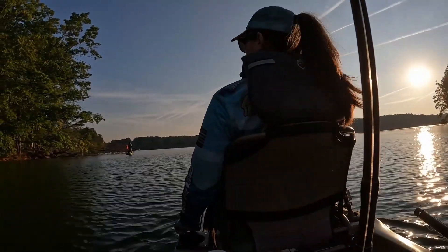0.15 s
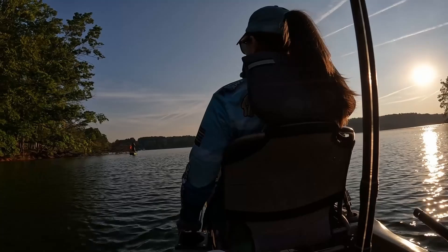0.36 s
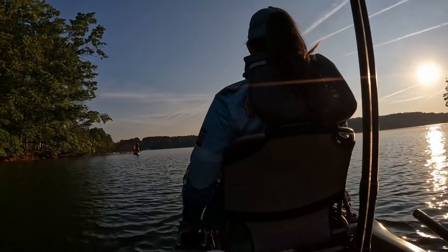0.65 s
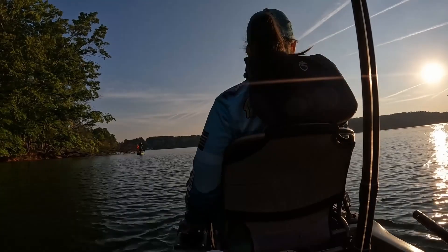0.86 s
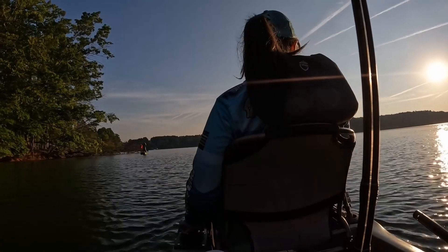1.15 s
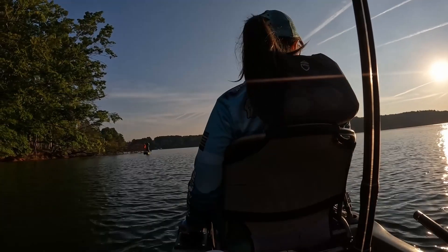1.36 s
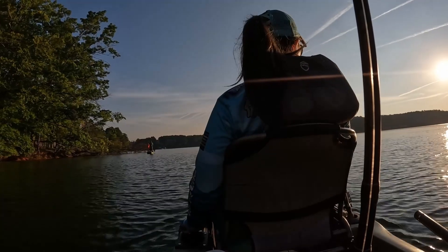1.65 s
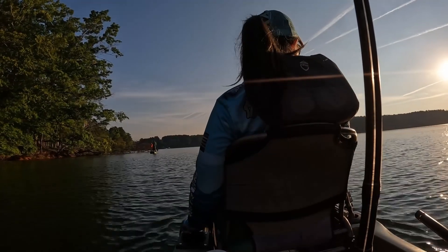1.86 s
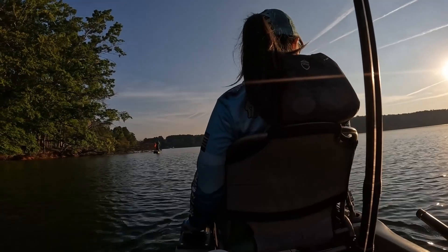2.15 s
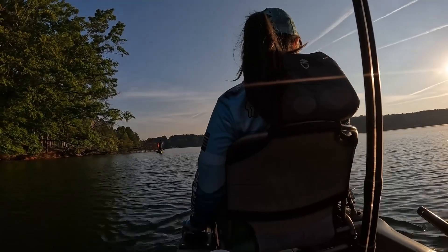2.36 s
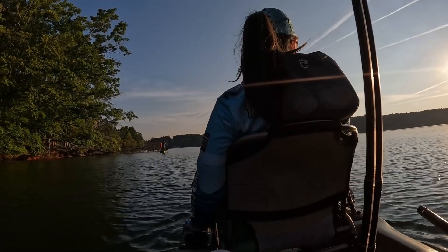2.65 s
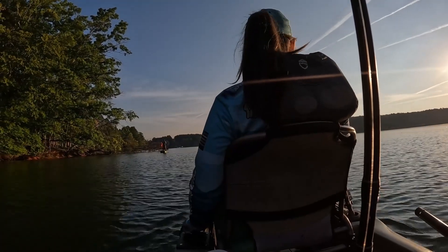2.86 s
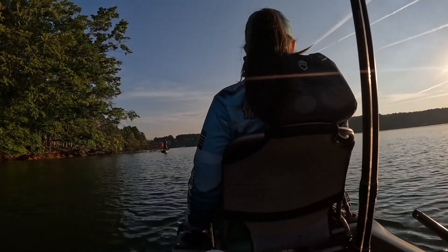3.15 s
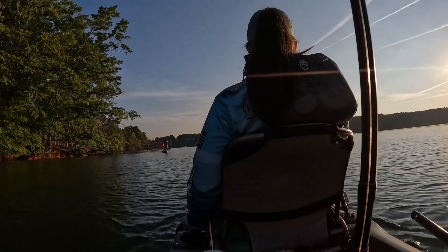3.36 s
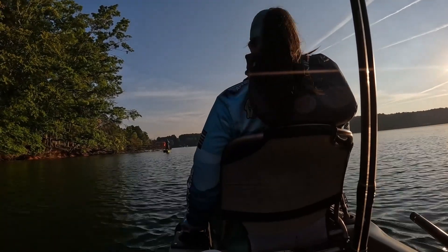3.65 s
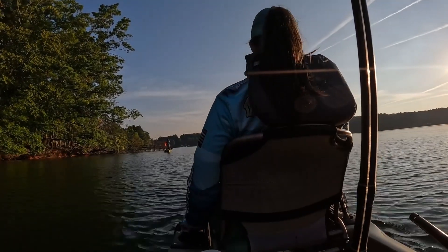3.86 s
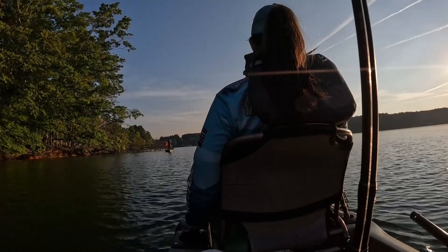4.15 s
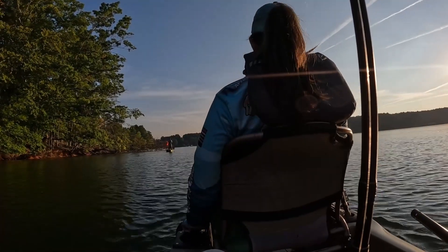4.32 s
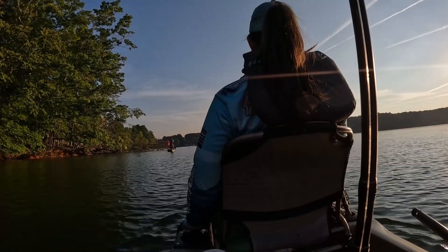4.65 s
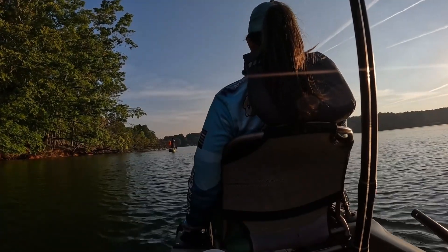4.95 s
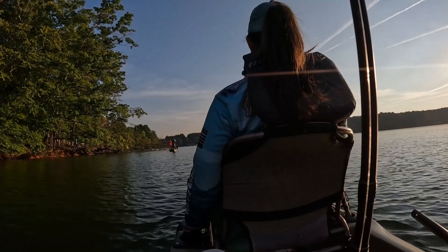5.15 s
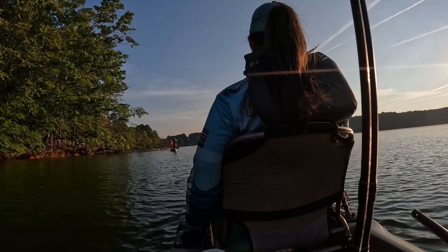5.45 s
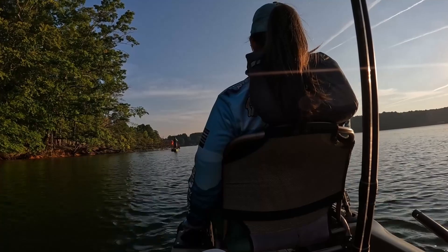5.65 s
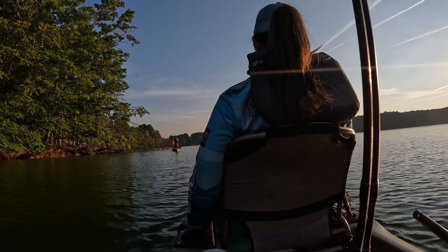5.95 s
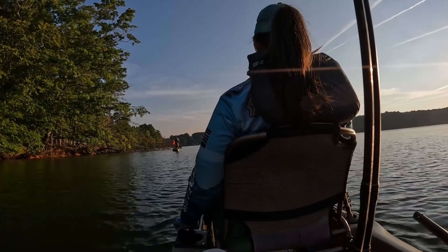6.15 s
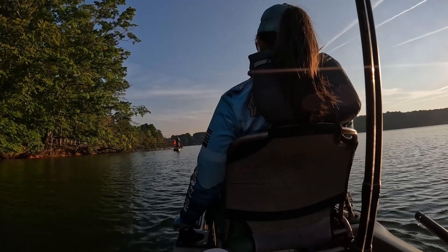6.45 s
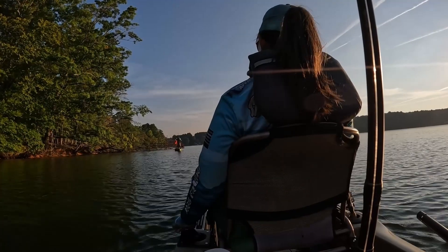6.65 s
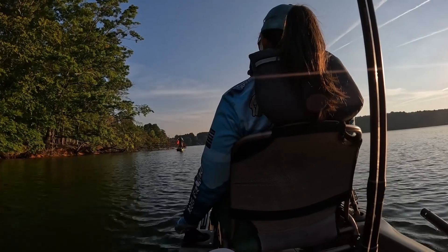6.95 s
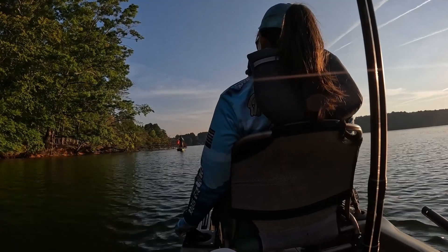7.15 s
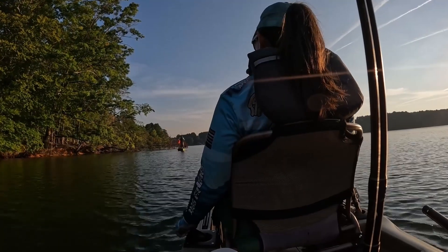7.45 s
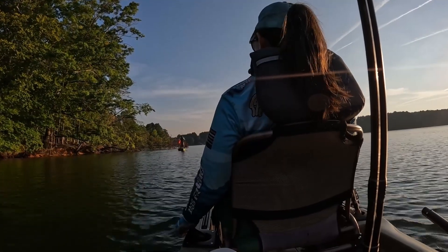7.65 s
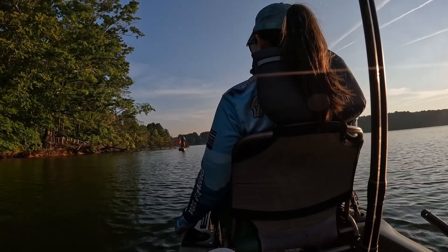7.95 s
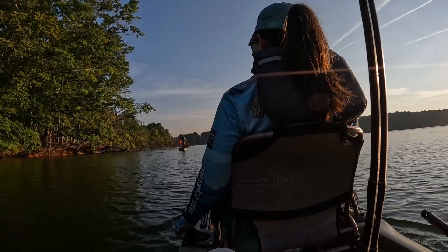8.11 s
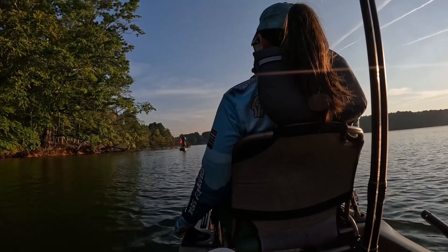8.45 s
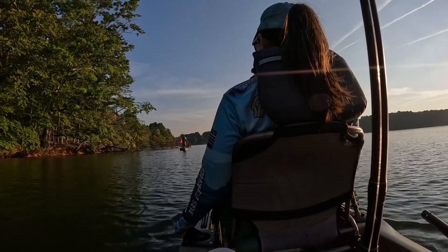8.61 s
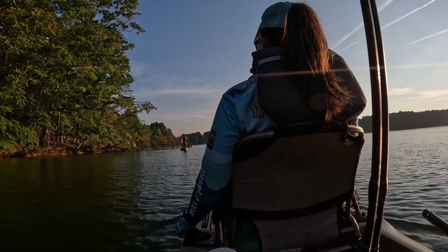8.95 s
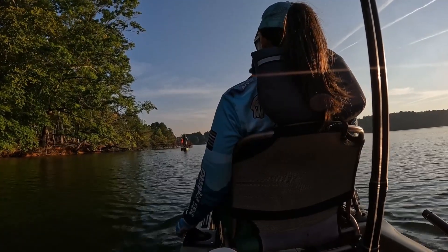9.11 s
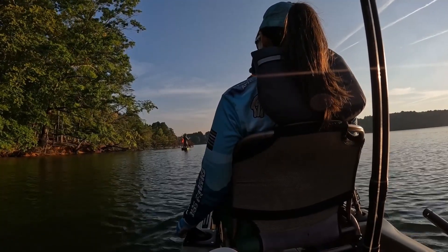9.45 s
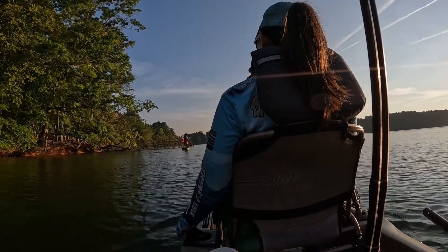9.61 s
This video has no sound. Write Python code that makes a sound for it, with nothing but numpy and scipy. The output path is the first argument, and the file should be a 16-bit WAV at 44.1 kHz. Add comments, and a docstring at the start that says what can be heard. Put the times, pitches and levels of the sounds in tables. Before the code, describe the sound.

Calm lake water gulps low under a hollow plastic kayak, with wet slaps, bubbly plops, small trickles and occasional dry fitting clicks close by.

```python
"""Low gulps under a hollow plastic hull come first, with slaps and plops along its side: a kayak on a calm lake,
heard by a stereo pair just behind the seat. Gulps are short gliding tones; slaps are a bubble note in splash noise.
Crowds of small bubbles make the lapping and trickling, and filtered noise makes the wash, murmur and hiss.
Close by, fittings click as noise bursts in resonances, ringing modes make one knock on the deck, and a jacket
rustles as grainy noise. Far off in the trees a bird calls faintly, a run of arched notes smeared by the woods."""
import sys
import numpy as np
from scipy import signal
from scipy.fft import rfft, irfft
from scipy.io import wavfile
from scipy.ndimage import uniform_filter1d

SR = 44100
rng = np.random.default_rng(int(sys.argv[2]) if len(sys.argv) > 2 else 0)


def generate_wav(sig):
    """Save sig (samples, or channels by samples) to the path in sys.argv[1] as 16-bit PCM at SR."""
    pcm = np.round(np.clip(np.atleast_2d(sig).T, -1, 1) * 32767).astype(np.int16)
    wavfile.write(sys.argv[1], SR, pcm)


N = 431298

# Air pockets under the hull. Each row: crest [s], peak level [dB], pitch [Hz], left over right [dB].
GULPS = [(0.013, -38.5, 138, -16), (0.201, -40, 133, 4), (0.457, -32.5, 133, -10), (0.456, -39, 316, -22),
         (0.477, -32.5, 216, -20), (0.477, -48, 343, -22), (0.531, -37.5, 97, -10),
         (0.557, -36.5, 143, -15), (0.61, -37.5, 121, -7), (0.698, -44, 119, -6), (0.924, -43, 99, -4),
         (1.003, -45, 110, -4), (1.461, -37.5, 115, -10), (1.542, -41, 149, -8), (1.595, -30.5, 162, -14),
         (1.6, -39.5, 277, -20), (1.775, -45.5, 153, 14), (2.291, -39, 101, -7), (2.676, -37, 119, -9),
         (2.73, -42.5, 115, -8), (2.797, -36, 112, -6), (3.1, -52, 440, -17), (3.103, -32, 221, -26),
         (3.153, -35, 132, -13), (3.193, -37.5, 120, -14), (3.395, -38, 112, -5), (3.469, -44, 125, 10),
         (3.806, -41.5, 115, -8), (3.861, -37, 140, 7), (4.125, -30, 133, -5), (4.143, -35.5, 130, 2),
         (4.166, -48, 417, 0), (4.203, -39, 118, 3), (4.271, -34.5, 133, 3), (4.297, -36, 177, -7),
         (4.671, -43, 136, -6), (4.713, -28.5, 133, -8), (4.752, -40, 152, -15), (4.927, -41, 106, -5),
         (5.108, -32.5, 176, -21), (5.294, -47, 319, -4), (5.298, -33, 180, 14), (5.325, -40, 150, -12),
         (5.722, -37, 135, -10), (5.806, -38, 126, -8), (5.831, -37.5, 169, -14), (6.008, -37, 246, -21),
         (6.099, -40, 93, -4), (6.24, -38, 102, -8), (6.289, -35.5, 142, 2), (6.377, -39.5, 121, -7),
         (6.769, -36.5, 142, -15), (6.808, -41, 110, -5), (6.976, -44, 102, -8), (6.998, -37.5, 101.5, -9),
         (7.114, -43.5, 105, -6), (7.589, -40.5, 99, -6), (7.656, -43, 131, -13), (8.028, -36, 120, -9),
         (8.271, -35, 116, -1), (8.327, -44, 129, -11), (8.596, -42.5, 115, -17), (8.746, -41.5, 155, 9),
         (9.298, -41.5, 99.4, -7), (9.352, -39, 110, -5.5)]
# Slaps at the waterline beside the seat.
# Each row: start [s], bubble level before trim [dB], bubble pitch [Hz], splash re bubble before trim [dB].
SLAPS = [(0.099, -56.5, 1570, -4), (0.664, -50, 1063, 1), (0.879, -49.5, 1880, -9), (0.885, -50.5, 1165, 3),
         (0.896, -46.5, 1466, -10), (0.914, -55, 574, -10), (0.976, -59, 1200, -5), (1.011, -59, 1920, 0),
         (1.042, -54, 3120, -23), (1.055, -46.5, 1796, -25), (1.484, -48.5, 1140, -14),
         (1.514, -44.5, 976, -16), (1.519, -49, 740, -1), (1.639, -50, 1110, -24), (1.767, -60.5, 747, 14),
         (1.994, -56.5, 1550, -3), (2.221, -53.5, 1245, -5), (2.239, -54, 750, 3.5),
         (2.424, -47.5, 659, -12), (2.511, -69.5, 1180, 2), (2.739, -53, 1490, -7), (2.809, -62, 737, -3),
         (2.927, -67, 900, -16), (3.026, -64, 1790, -16), (3.151, -63.5, 1000, -4), (3.223, -61, 1300, 4),
         (3.297, -57, 1565, 9), (4.106, -45.5, 887, 11), (4.145, -36, 885, 0.5), (4.156, -37, 617, -2),
         (4.174, -44.5, 587, -6), (4.241, -47.5, 875, 0), (4.269, -55, 654, 0), (4.336, -52, 980, -6),
         (4.544, -55, 1080, 1), (4.852, -33.5, 1007, -16), (4.8494, -40, 1516, -8), (4.852, -57.5, 2980, 1),
         (4.859, -48.5, 610, -23), (5.287, -49, 768, 11.5), (5.332, -59.5, 1030, 7),
         (5.539, -60.5, 1250, 5), (5.587, -58, 940, 1), (5.612, -65.5, 900, 12), (5.664, -59.5, 730, 5),
         (5.891, -57.5, 2210, -3), (5.906, -53.5, 1020, 3.5), (6.043, -61.5, 1830, 4.5),
         (6.14, -54, 1170, 9.5), (6.172, -50.5, 950, 11.5), (6.282, -60.5, 740, 14.5),
         (6.695, -58.5, 1020, -1), (6.776, -59, 2870, -26), (6.823, -74, 696, 12),
         (6.844, -61.5, 1280, -10), (7.49, -62, 1930, -14), (8.411, -62.5, 1160, 2),
         (8.508, -59.5, 970, -38), (8.566, -68.5, 1175, 0), (8.69, -66.5, 2510, -16),
         (9.228, -56, 1174, -3), (9.543, -63.5, 2350, -5), (9.61, -68.5, 1500, 10)]
# Ripples running along the side, as gains.
# Each row: start [s], length [s], lapping [dB], air tone [dB], trickle [dB].
RUNS = [(0.878, 0.16, -70.5, -90, -74), (1.627, 0.03, -77, -66, -95), (1.767, 0.17, -78.5, -66.5, -84),
        (1.982, 0.25, -80, -73, -76), (2.693, 0.31, -79.5, -98, -79), (3.203, 0.22, -89, -100, -71),
        (4.101, 0.039, -63, -61, -66), (4.224, 0.15, -87, -67, -73), (4.468, 0.26, -78, -77, -76),
        (4.823, 0.22, -89, -76, -82), (5.547, 0.11, -71, -80, -76), (6.552, 0.2, -98, -75, -89),
        (6.794, 0.13, -77, -87, -89), (7.54, 0.2, -74, -85, -88), (8.1, 0.057, -66, -76, -74),
        (8.904, 0.1, -92, -73.5, -99), (9.157, 0.25, -83, -74.5, -75)]
# The boat's rocking, as the level of the slosh between gulps. Each row: time [s], level [dB].
ROCKING = [(0.0, -71), (1.06, -54.5), (1.25, -63), (2.6, -62), (3.1, -60.5), (6.24, -53), (6.42, -62.5),
           (6.86, -57), (9.35, -62), (9.78, -63.5)]
# Moments when the small water sounds dip. Each entry: time [s].
LULLS = [0.02, 1.33, 2.58, 3.6, 5.82, 6.46, 7.36, 9.74]
# Resonances of the hollow hull. Each row: pitch [Hz], nominal width before widening [Hz], level [dB].
HULL = [(627, 50, -2.5), (675, 16.4, -10), (914, 72, -0.5), (1040, 35, -5.5), (1208, 120, 0.5),
        (1456, 130, -1)]
# Tone of the hull's air, kept ringing by the wash.
# Each row: pitch [Hz], nominal width before widening [Hz], level [dB].
AIR_TONE = [(942, 66, -3), (1510, 89, -14)]
# Clicks of the fittings. Each row: start [s], click level [dB], body tones re click before a common boost [dB].
CLICKS = [(0.246, -39.5, -1), (0.921, -48.5, -3), (1.087, -52, 6), (1.1482, -46.5, 2), (2.1189, -40.5, 2.5),
          (2.507, -58, -17), (3.4, -51, -7), (4.0277, -41.5, 2.5), (4.138, -50, 5.5), (4.159, -54, -14),
          (4.2404, -56, 6), (5.363, -58, 4), (5.562, -58.5, 3), (5.671, -55, -4), (6.103, -52.5, -27),
          (6.172, -42.5, -33), (6.188, -40.5, -9), (7.214, -59, -0.5), (7.466, -54, -26),
          (7.545, -38.5, -0.5), (7.65, -40.5, 0), (8.0245, -39, -1.5), (8.109, -51, -3), (8.359, -52, -19),
          (8.264, -60.5, 2), (9.4426, -58.5, -23)]
# Modes of the fittings, the three body tones first. Each row: pitch [Hz], width [Hz], level [dB].
FITTING_MODES = [(1108, 180, 4.5), (1537, 150, -5), (1870, 340, -7), (2650, 260, 2.5), (3390, 280, 1),
                 (4320, 160, -2), (5110, 220, -3), (5990, 490, -6.5), (7500, 690, -11), (10370, 1400, -20)]
# A knock on the deck and its rebound. Each row: start [s], gain [dB].
KNOCKS = [(8.0713, -30), (8.075, -43.5)]
# Ringing modes of the deck. Each row: pitch [Hz], level [dB], time to fall 60 dB [s].
DECK_MODES = [(680, -13.5, 0.062), (750, -17.5, 0.16), (970, -4, 0.032), (1150, -15, 0.039),
              (1180, -6.5, 0.038), (1640, -7.5, 0.0098), (2290, -14, 0.03), (2990, 4, 0.0083),
              (3250, 10.5, 0.0022), (4300, -15, 0.012), (4730, -8, 0.009), (5540, -17, 0.011),
              (6160, -5.5, 0.002)]
# The paddler shifts and the jacket rubs. Each row: crest [s], level [dB], build-up [s].
SHIFTS = [(1.0, -70.5, 0.59), (3.7, -75.5, 0.3), (4.15, -65, 0.096), (4.521, -63, 0.012),
          (4.945, -68.5, 0.038), (6.18, -61, 0.05), (8.09, -74.5, 0.11), (8.9, -81.5, 1),
          (9.43, -76.5, 0.54)]
# Loudness of the far bird. Each row: time [s], level [dB].
BIRD_LEVEL = [(2.4, -100), (2.55, -81.5), (3.4, -77.5), (4.3, -83), (4.8, -100)]
# Spectrum of the wash under the hull. Each row: frequency [Hz], relative density [dB per Hz].
SLOSH = [(20, -16.5), (40, -3.5), (70, 2), (110, -3), (170, -5), (255, -13), (320, -18), (450, -23.5),
         (700, -74.5)]
# Spectrum of the rubbing jacket. Each row: frequency [Hz], relative density [dB per Hz].
CLOTH = [(600, -26), (1500, 0), (3000, 0), (6500, -5), (8500, -13), (12000, -16), (15000, -45)]
# Spectrum of the hull's low murmur. Each row: frequency [Hz], relative density [dB per Hz].
MURMUR = [(25, -16.5), (60, -14), (120, 1), (180, -1), (255, -2), (320, -14.5), (440, -15), (530, -28),
          (700, -49)]
# Spectrum of the background hiss. Each row: frequency [Hz], relative density [dB per Hz].
HISS = [(300, 8.5), (550, 3.5), (950, -8), (1400, -4.5), (2600, -11.5), (3000, -6), (3500, 6), (4100, -5.5),
        (6300, -0.5), (7500, -4), (8500, -14.5), (10000, -12), (12000, -40), (13500, -39)]
# How alike left and right are in the noise layers. Each row: frequency [Hz], likeness [0 to 1].
LIKENESS = [(30, 1), (120, 0.84), (300, 1), (1000, 0.2), (3500, 0.46), (7000, 0.61), (12000, 0.045)]

GULP_LEAD_S = 0.06  # each gulp is drawn this far either side of its crest
# The harder the water hits, the sooner the pocket closes:
# cycles from a middling strength up, doubled for every so many dB less.
GULP_CYCLES, MIDDLING_GULP_DB, GULP_HALVING_DB = 1.69, -30.5, 19
# The slosh swells around every gulp: level re the gulp, and the most the swell can reach.
STIR_DB, STIR_RISE_S, STIR_FALL_S, SLOSH_TOP_DB = -14.5, 0.023, 0.055, -50
# The onset of a slap takes half as long for every so many dB above a middling one.
MIDDLING_SLAP_DB, SLAP_HALVING_DB, MIDDLING_SLAP_HZ = -52, 15.5, 1030
FLUTTER_HZ = (40, 302)  # how fast a splash breaks up and its bubble wobbles
PUSH_HZ = (278, 613)  # the dull push of a wavelet on the side
RUN_RISE_S, RUN_FALL_S = 0.053, 0.058
CALM_LAPPING_DB, CALM_RINGING_DB, CALM_TRICKLE_DB = -83, -90.5, -88  # gains between the ripples
# Every slap leaves a wake of bubbles and a finer fizz: base levels re the slap, then lag, rise and fall.
WAKE_DB, FIZZ_DB, WAKE_LAG_S, WAKE_RISE_S, WAKE_FALL_S = -24, -48, 0.0041, 0.018, 0.084
# A splashy slap stirs more; a higher one leaves slightly more wake and far more fizz.
WAKE_SPLASH_SHARE, WAKE_DB_PER_OCTAVE, FIZZ_DB_PER_OCTAVE = 0.47, 1.5, 26
LULL_DB, LULL_S = -3.5, 0.1  # depth of a dip, and time from its middle to 1/e of that depth
HULL_T60_S = 0.18
SETTLE_S, SETTLE_SHARE, STILL_JACKET_DB = 0.015, 0.22, -81.5  # stopping: shortest time plus share of build-up
MURMUR_DB, HISS_DB = -64.5, -78
CUTOFF_HZ = 15500  # from here up the treble is at least 60 dB down
LEFT_RIGHT = np.array([[1], [-1]])  # opposite signs for the two sides


def under_hull(small_db=-1.0, pan_db=-5, surge_db=3.0):
    """Big gulps, a crowd of small ones, and the dull wash of moving water, mostly on the right."""
    big, small = np.zeros((2, N)), np.zeros((2, N))
    for s, db, hz, pan in GULPS:
        softer_db = max(MIDDLING_GULP_DB - db, 0)
        length = GULP_CYCLES / hz * 2 ** (softer_db / GULP_HALVING_DB)
        add(big, s - GULP_LEAD_S, from_db(db) * gulp(hz, length), pan)
    for when, size, pitch, length, side in rng.random((300, 5)):
        hz = 78 * 2.8 ** pitch
        pocket = from_db(4.1 * size) * gulp(hz, (1.47 + length) / hz)
        add(small, when * N / SR - GULP_LEAD_S, pocket, pan_db + 22 * (side - 0.5))

    slow = uniform_filter1d(uniform_filter1d(rng.standard_normal(N), size=1200), size=1200)
    surge = from_db(surge_db * rms_one(slow))
    sides = from_db(pan_db / 2 * LEFT_RIGHT)
    wash = rms_one(coloured(rng.standard_normal((2, N)), SLOSH) * surge * sides)

    stir_rows = [(s, db + STIR_DB, STIR_RISE_S, 0, STIR_FALL_S) for s, db, _, _ in GULPS]
    stirred = swells(stir_rows, -np.inf)
    rocking = from_db(in_time(ROCKING)) * lulls()
    # past a certain swell the water spends itself in the big gulps
    swell = np.minimum(np.hypot(stirred, rocking), from_db(SLOSH_TOP_DB))
    return big + swell * (from_db(small_db) * rms_one(small) + wash)


def gulp(hz, length, rise=0.28, port_phase=0.84):
    """A trapped air pocket swells and fades within a few cycles, rising in pitch as it is squeezed."""
    t = np.arange(-GULP_LEAD_S, GULP_LEAD_S, 1 / SR)
    u = t / length
    phase = 2 * np.pi * np.cumsum(hz * (1 + rise * np.tanh(u))) / SR
    phase -= phase[len(t) // 2]
    # the sound bends round the hull and reaches the left side a little out of step (radians)
    left_lag = port_phase * rng.normal() * np.array([[1], [0]])
    return np.cos(phase + left_lag) / np.cosh(3.45 * u)


def slaps(trim_db=-2.0, bubble_t60=0.044, splash_s=0.013, spread=1.404, wetting_s=0.001, glide=0.07,
          rough=0.27, grain_db=4.0, push_db=-10):
    """A wavelet hits the side: grainy splash and dull push around the wobbling note of the bubble it closes."""
    out = np.zeros((2, N))
    t = np.arange(int(0.07 * SR)) / SR
    for s, db, hz, splash_db in SLAPS:
        water, grains, wobble = rng.standard_normal((3, len(t)))
        grains = rms_one(band(grains, *FLUTTER_HZ))
        wobble = rms_one(band(wobble, *FLUTTER_HZ))

        burst = water * from_db(grain_db * grains)
        splash = rms_one(band(burst, hz / spread, hz * spread))
        push = from_db(push_db) * rms_one(band(water, *PUSH_HZ))
        spray = (splash + push) * np.exp(-t / splash_s) * (1 - np.exp(-t / 0.0018))

        # small bubbles die sooner and tend to glide up, big ones tend to sag
        rise = glide * (np.log2(hz / MIDDLING_SLAP_HZ) + rng.uniform(-1.1, 1))
        t60 = bubble_t60 * np.sqrt(MIDDLING_SLAP_HZ / hz)
        attack_s = wetting_s * 2 ** ((MIDDLING_SLAP_DB - db) / SLAP_HALVING_DB)
        note = bubble(hz, t60, attack_s, rise)
        note = note * (1 + rough * wobble[:len(note)])

        pan = rng.normal(-3.0, 1)
        add(out, s, from_db(db + trim_db) * note, pan)
        add(out, s, from_db(db + trim_db + splash_db) * 0.49 * spray, pan)
    return out


def bubble(hz, t60, attack_s, rise):
    """A bubble pinches off and rings, its pitch gliding by the share rise as it moves; envelope peak 1."""
    t = np.arange(int(np.clip(t60, 0.005, 0.07) * SR)) / SR
    u = t / max(t60, 0.005)
    phase = 2 * np.pi * np.cumsum(hz * (1 + rise * (np.tanh(3 * u) - 0.3))) / SR
    envelope = np.exp(-np.log(1000) * u) * (1 - np.exp(-t / attack_s)) ** 2
    return np.sin(phase) * envelope / envelope.max()


def waterline(direct_db=-4.5, hollow_db=-1.5, trickle_db=-5, droplets_db=-10, ripple_blur=3.6):
    """Dense, quickly damped bubbles, direct and through the hull; wash rings the air tone; stray droplets."""
    ripples = bubbling(540, 1600, cycles=12, size_db=9, count=2900)
    trickle = bubbling(1250, 2700, cycles=18, size_db=8, count=3200)
    droplets = bubbling(1100, 3600, cycles=24, size_db=12, count=320)
    hollow = rms_one(hull(ripples, HULL, ripple_blur))
    lapping = from_db(direct_db) * ripples + from_db(hollow_db) * hollow
    dribble = from_db(trickle_db) * trickle + from_db(droplets_db) * droplets
    # one wash common to both sides, plus a little of each side's own
    washing = rms_one(rng.standard_normal(N) + 0.36 * rng.standard_normal((2, N)))
    ringing = sum(from_db(db) * rms_one(resonate_twice(washing, hz, 2 * width)) for hz, width, db in AIR_TONE)

    lapping_runs = [(s, length, db) for s, length, db, _, _ in RUNS]
    ringing_rows = [(s, db, RUN_RISE_S, length, RUN_FALL_S) for s, length, _, db, _ in RUNS]
    trickle_runs = [(s, length, db) for s, length, _, _, db in RUNS]
    lapping_gain = stirred_by_ripples(lapping_runs, WAKE_DB, CALM_LAPPING_DB, WAKE_DB_PER_OCTAVE)
    ringing_gain = swells(ringing_rows, CALM_RINGING_DB)
    dribble_gain = stirred_by_ripples(trickle_runs, FIZZ_DB, CALM_TRICKLE_DB, FIZZ_DB_PER_OCTAVE)
    return lapping_gain * lapping + ringing_gain * ringing + dribble_gain * dribble


def bubbling(low_hz, high_hz, cycles, size_db, count, glide=0.31):
    """Small bubbles at random moments, pitches and places, each with its own upward glide; rms 1."""
    out = np.zeros((2, N))
    for when, size, pitch, life, side, rise in rng.random((count, 6)):
        hz = low_hz * (high_hz / low_hz) ** pitch
        note = bubble(hz, cycles * (0.5 + life) / hz, 0.00065, glide * rise ** 2)
        add(out, when * N / SR, from_db(size_db * size ** 2) * note, 6 * (side - 0.5))
    return rms_one(out)


def stirred_by_ripples(runs, wake_db, calm_db, db_per_octave):
    """How hard the waterline bubbles: during each run (start s, length s, dB) and just after each slap."""
    rows = [(s, db, RUN_RISE_S, length, RUN_FALL_S) for s, length, db in runs]
    for s, db, hz, splash_db in SLAPS:
        octaves = np.log2(hz / MIDDLING_SLAP_HZ)
        stir_db = wake_db + db_per_octave * octaves + WAKE_SPLASH_SHARE * splash_db
        rows.append((s + WAKE_LAG_S, db + stir_db, WAKE_RISE_S, 0, WAKE_FALL_S))
    return swells(rows, calm_db)


def lulls():
    """Gain of the small water sounds, which dip briefly by a few dB."""
    t = np.arange(N) / SR
    return from_db(LULL_DB * sum(np.exp(-((t - s) / LULL_S) ** 2) for s in LULLS))


def hull(x, modes, blur=1, apart=0.41):
    """The air inside the hull rings on in clusters of close modes; blur widens the clusters."""
    t = np.arange(int(0.5 * SR)) / SR
    mid, side = rng.standard_normal((2, len(t)))
    echoes = (mid + apart * side * LEFT_RIGHT) * np.exp(-np.log(1000) * t / HULL_T60_S)
    response = sum(from_db(db) * rms_one(resonate_twice(echoes, hz, 2 * blur * width)) for hz, width, db in modes)
    return signal.fftconvolve(x, rms_one(response) / np.sqrt(len(t)), axes=1)[:, :N]


def fittings(rasp_s=0.0041, body_lag_s=0.0018, body_db=6.0, apart=0.3):
    """A fitting slips in a few milliseconds of tiny catches; its low body tones answer a moment later."""
    out = np.zeros((2, N))
    t = np.arange(int(0.08 * SR)) / SR
    for s, db, weight_db in CLICKS:
        mid, side = rng.standard_normal((2, len(t)))
        rasp = (mid + apart * side * LEFT_RIGHT) * np.exp(-t / rasp_s) * (1 - np.exp(-t / 0.00031))
        tones = [(-1) ** k * from_db(mode_db) * resonate(rasp, hz, width)
                 for k, (hz, width, mode_db) in enumerate(FITTING_MODES)]
        body, snap = sum(tones[:3]), sum(tones[3:])
        add(out, s, from_db(db) * 0.086 * rms_one(snap), -1)
        add(out, s + body_lag_s, from_db(db + weight_db + body_db) * 0.051 * rms_one(body), -1.5)
    return out


def knock(contact_s=0.00007):
    """Each contact rings the deck's modes; plastic gives a little, which rounds the attack."""
    out = np.zeros((2, N))
    t = np.arange(int(0.2 * SR)) / SR
    ring = 0
    for k, (hz, db, t60) in enumerate(DECK_MODES):
        decay = np.exp(-np.log(1000) * t / t60)
        ring = ring + (-1) ** k * from_db(db) * np.sin(2 * np.pi * hz * t) * decay
    for s, db in KNOCKS:
        add(out, s, from_db(db) * ring * (1 - np.exp(-t / contact_s)), -2)
    return out


def jacket(grain_db=2.5):
    """Stiff cloth rubs in clumps of fine grains; most movements build up more slowly than they stop."""
    clumps = rms_one(uniform_filter1d(rng.standard_normal(N), size=90))
    rows = [(s, db, build, 0, SETTLE_S + SETTLE_SHARE * build) for s, db, build in SHIFTS]
    grains = rng.standard_normal((2, N)) * from_db(grain_db * clumps)
    return swells(rows, STILL_JACKET_DB) * coloured(grains, CLOTH)


def far_bird(notes_per_s=8.9, pitch_hz=2300, scatter=0.04, unsteady=0.18):
    """A long run of short, hoarse, arched notes, each a little off in pitch and time, smeared by the woods."""
    beat = np.arange(N) / SR * notes_per_s
    beat = np.maximum(beat + np.interp(beat, np.arange(200), unsteady * rng.uniform(-1, 1, 200)), 0)
    place = beat % 1 * 2 - 1  # -1 to 1 across each note
    waver = 0.05 * rms_one(uniform_filter1d(rng.standard_normal(N), size=200))
    note_offset = scatter * rng.standard_normal(200)[beat.astype(int)]
    top_hz = pitch_hz * (1 + waver + note_offset)
    arch_hz = top_hz * (1 - 0.6 * place ** 2)
    notes = np.sin(2 * np.pi * np.cumsum(arch_hz) / SR) * np.exp(-(1.5 * place) ** 2)
    t = np.arange(SR // 2) / SR
    woods = rng.standard_normal((2, len(t))) * np.exp(-t / 0.08)
    woods = woods + woods.sum(axis=0)  # partly shared by both sides
    smeared = signal.fftconvolve(notes[None], woods, axes=1)[:, :N]
    return from_db(in_time(BIRD_LEVEL)) * rms_one(smeared)


def hull_murmur():
    """The low murmur of the hollow hull, as noise weighted to the bass."""
    return from_db(MURMUR_DB) * coloured(rng.standard_normal((2, N)), MURMUR)


def background_hiss():
    """A faint, steady hiss behind everything, as shaped noise."""
    return from_db(HISS_DB) * coloured(rng.standard_normal((2, N)), HISS)


def from_db(db):
    """Decibels to gain."""
    return 10 ** (np.asarray(db) / 20)


def rms_one(x):
    """Scale to unit power."""
    return x / np.sqrt(np.mean(x ** 2) + 1e-20)


def in_time(rows):
    """A level curve of (s, dB) rows, sample by sample."""
    s, db = np.transpose(rows)
    return np.interp(np.arange(N) / SR, s, db)


def at_hz(points, hz):
    """Read a spectrum on a log-frequency axis."""
    point_hz, value = np.transpose(points)
    return np.interp(np.log(hz), np.log(point_hz), value)


def add(out, s, sound, pan_db=0):
    """Mix a sound into a stereo track at time s; positive pan leans left."""
    sides = from_db(pan_db / 2 * LEFT_RIGHT)
    i = int(s * SR)
    first, last = max(i, 0), min(i + sound.shape[-1], N)
    if last > first:
        out[:, first:last] += sides / sides.mean() * sound[..., first - i:last - i]


def band(x, low_hz, high_hz):
    """Gentle band-pass."""
    return signal.sosfilt(signal.butter(2, [low_hz, high_hz], "band", fs=SR, output="sos"), x)


def resonate(x, hz, width):
    """One resonance, with a gain of about 1 on top."""
    r = np.exp(-np.pi * width / SR)
    feed = np.array([1, 0, -1]) * (1 - r * r) / 2
    return signal.lfilter(feed, [1, -2 * r * np.cos(2 * np.pi * hz / SR), r * r], x)


def resonate_twice(x, hz, width):
    """The same resonance in series, for steeper skirts."""
    return resonate(resonate(x, hz, width), hz, width)


def coloured(pair, spectrum):
    """Two unrelated signals become stereo of the given spectrum, as alike as LIKENESS says; rms 1."""
    hz = np.maximum(np.arange(N // 2 + 1) * SR / N, 1)
    gain = from_db(at_hz(spectrum, hz)) * np.minimum(hz / spectrum[0][0], 1) ** 2
    alike = np.clip(at_hz(LIKENESS, hz), -1, 1)
    mid, side = rfft(pair) * gain
    return rms_one(irfft(np.sqrt(1 + alike) * mid + np.sqrt(1 - alike) * side * LEFT_RIGHT, N))


def swells(rows, rest_db):
    """Gain from rows (s, dB, rise s, hold s, fall s); swells add in power on a resting level."""
    t = np.arange(0, N, 64) / SR
    power = from_db(rest_db) ** 2
    for s, db, rise, hold, fall in rows:
        away = np.maximum(np.maximum((s - t) / rise, (t - s - hold) / fall), 0)
        power = power + (from_db(db) * np.exp(-away)) ** 2
    return np.interp(np.arange(N) / SR, t, np.sqrt(power))


def scene(slap_ring_db=-20, blow_ring_db=-20, blow_blur=5):
    """Water, boat, jacket and shore; slaps ring the hull's narrow modes, hard blows ring them far wider."""
    water, blows = slaps(), fittings() + knock()
    slap_ring = from_db(slap_ring_db) * hull(water, HULL)
    blow_ring = from_db(blow_ring_db) * hull(blows, HULL, blow_blur)
    small_water = lulls() * (waterline() + hull_murmur())
    near = under_hull() + water + small_water + blows + slap_ring + blow_ring + jacket()
    return near + far_bird() + background_hiss()


def record(dry):
    """The top of the treble is cut steeply."""
    return signal.sosfilt(signal.cheby2(12, 60, CUTOFF_HZ, fs=SR, output="sos"), dry)


dry = scene()
out = record(dry)
generate_wav(out)
```